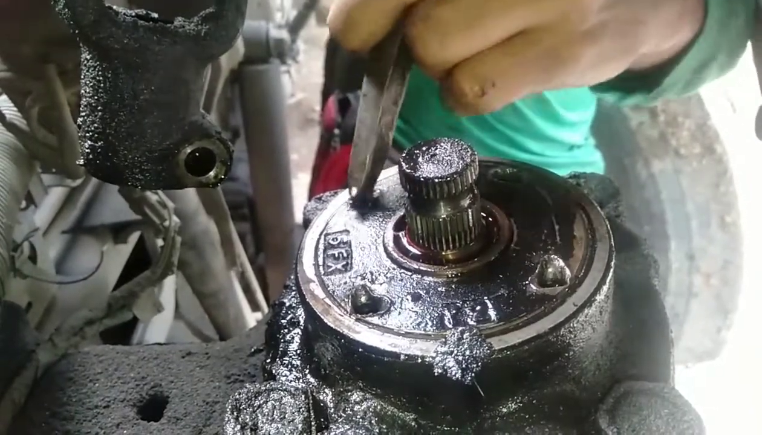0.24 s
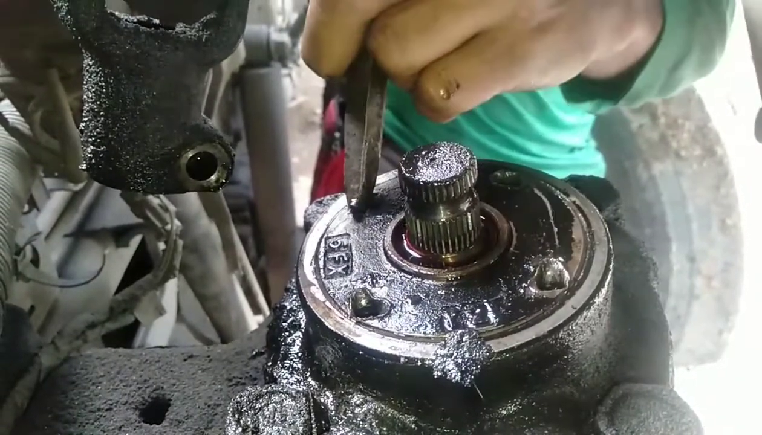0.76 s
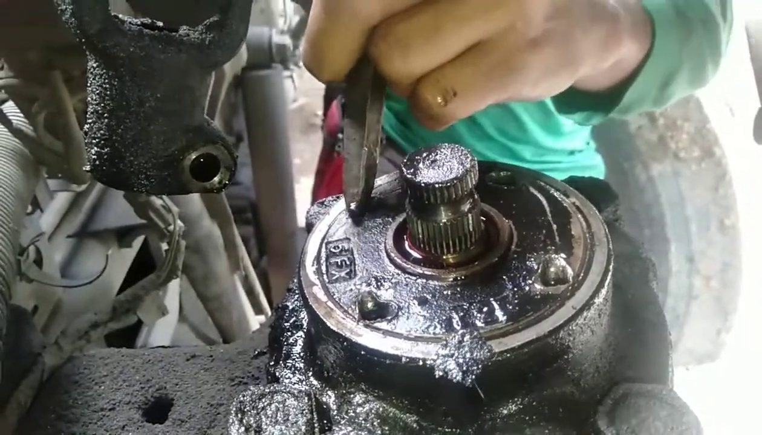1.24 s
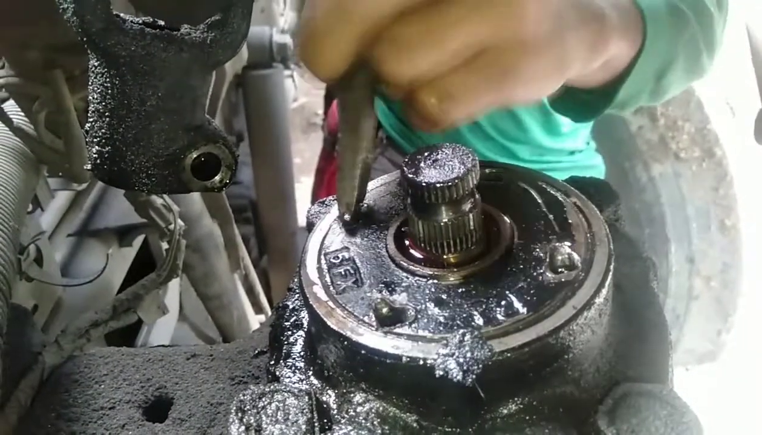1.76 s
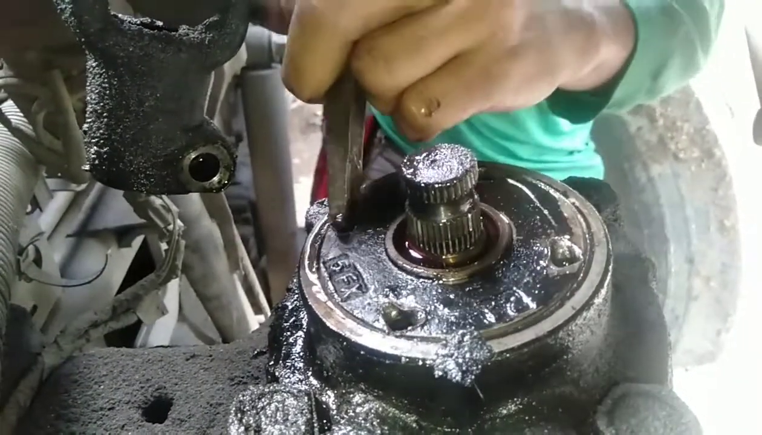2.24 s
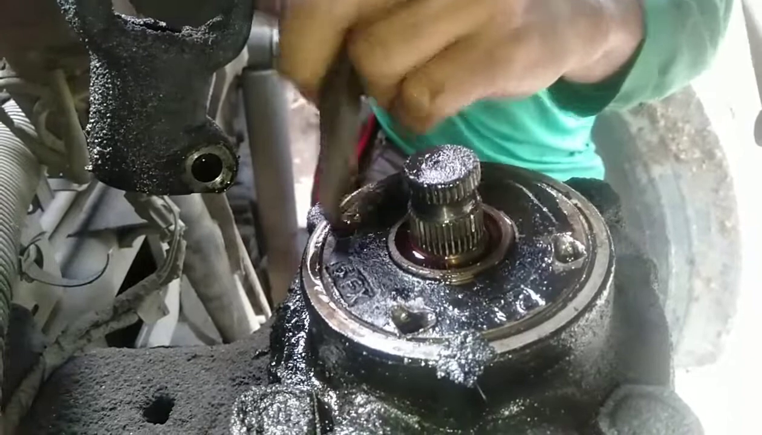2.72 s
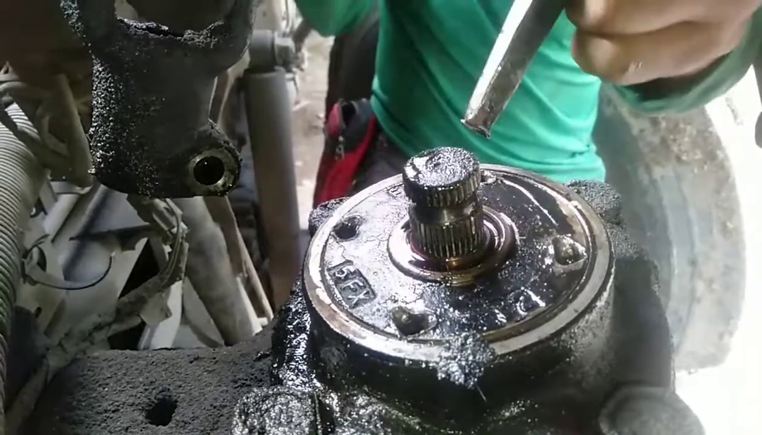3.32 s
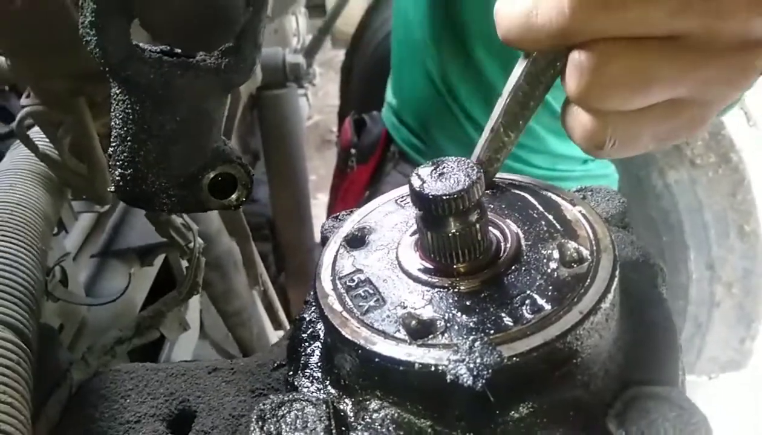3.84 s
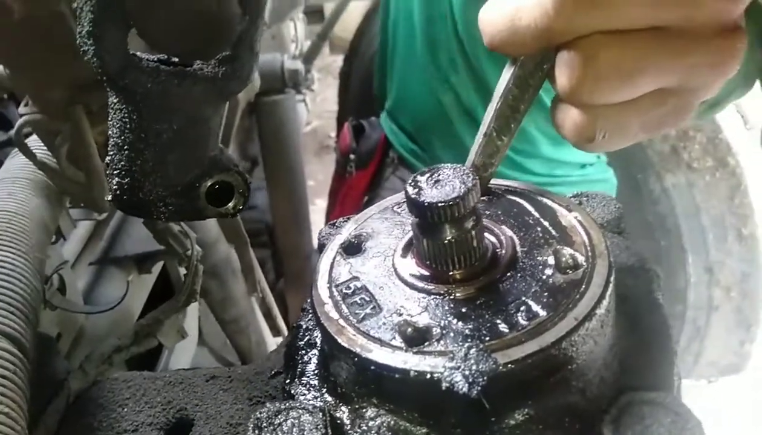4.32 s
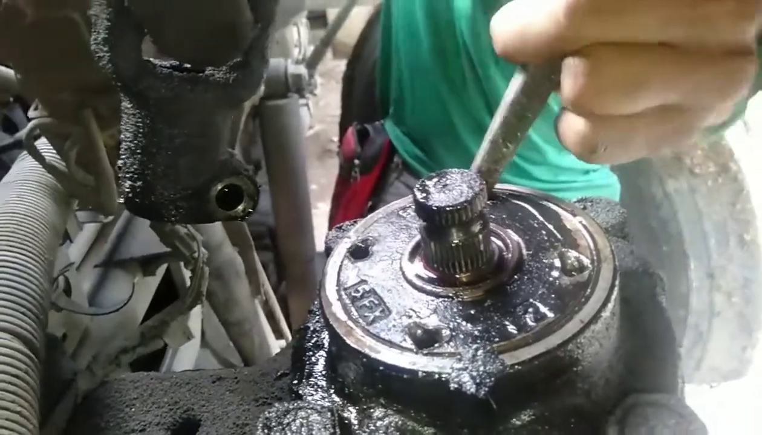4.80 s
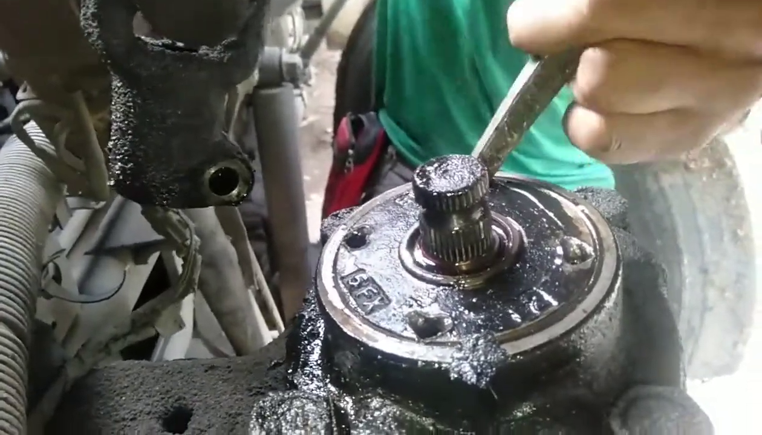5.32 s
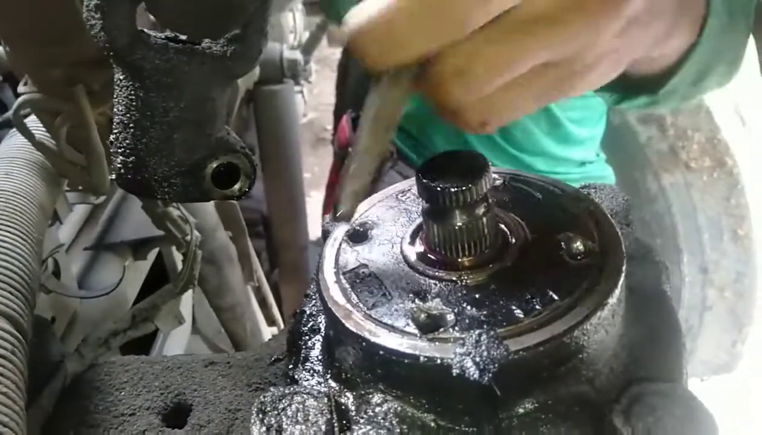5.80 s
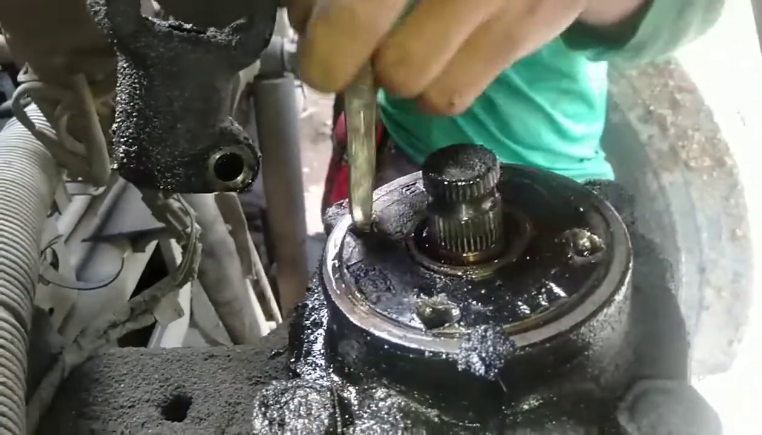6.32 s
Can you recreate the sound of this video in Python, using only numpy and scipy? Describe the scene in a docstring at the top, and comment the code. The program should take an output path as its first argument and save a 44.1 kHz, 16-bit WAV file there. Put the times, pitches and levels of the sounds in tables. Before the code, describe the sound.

Hammer blows on a steel chisel ring sharply in a workshop, five spaced clangs, a pause with clinks and scrapes, then three quicker blows and rattling.

```python
"""A hammer drives a steel chisel against the cover of a truck's steering gear, close by, in a workshop.
Each blow is a burst of shaped noise for the steel clash, over fading sine tones that beat as the chassis rings.
At one blow the cover gives way with a thud; around that blow the cover rattles, in ticks and short rings.
Between and after the runs of blows the chisel scrapes (uneven noise) and clinks (brief high rings).
Behind it all lie filtered noise for the air, a thin hiss and a low wavering hum."""
import sys
import numpy as np
from scipy import signal
from scipy.fft import rfft, irfft
from scipy.io import wavfile
from scipy.ndimage import uniform_filter1d

SR = 44100
rng = np.random.default_rng(int(sys.argv[2]) if len(sys.argv) > 2 else 0)


def bounce(signal):
    """Save signal as a 16-bit WAV file at the path given by the first command-line argument."""
    frames = np.transpose(np.atleast_2d(signal))
    limited = np.clip(frames, -1, 1)
    pcm = np.round(limited * 32767).astype(np.int16)
    wavfile.write(sys.argv[1], SR, pcm)


N = 288855
TIME = np.arange(N) / SR

# In all tables, t60 is the time a sound takes to fade by 60 dB.
# Colours give only the balance of pitches; the loudness is set separately.

# Hammer blows; the first lands just before the start:
# (time [s], force [dB], place of the tip [0 near rim - 1 far rim], how far the cover gives way [0-1],
#  chisel pitch [Hz], chisel ring [dB])
BLOWS = [(-.085, 0.5, 0, 0.23, 6500, -30), (0.8676, -.5, 0.035, 0, 6300, -22.5),
         (1.3232, 0, 0, .15, 6670, -19.5), (1.7316, 0.5, 0, 0.05, 6520, -23),
         (2.1612, .5, 0, 0.02, 6580, -21), (2.5680, -0.5, 0.11, 0.06, 6630, -21.5),
         (4.6407, 0, 0.94, 0.1, 6300, -27.5), (4.9019, -.5, 0.68, 0.95, 6580, -18.5),
         (5.051, -.5, 0.71, 0.21, 5350, -21)]

# What a blow wakes, one row per part:
# (level at the near rim [dB], extra at the far rim [dB], extra when the cover gives way fully [dB])
CLASH_RULE = (-21.5, 0.5, 1)
TREBLE_RULE = (-0.2, 6, -2.5)  # tilts the colour of the clash
ROOM_RULE = (-31.5, -4.5, 6.5)
CHASSIS_RULE = (-36, 0.5, -18.5)
COVER_RULE = (-70, 41, -5)
FRAME_RULE = (-53.5, 3, 26)

# Clash of steel on steel: colour (frequency [Hz], level [dB per Hz]),
# and fading before any stretch (frequency [Hz], t60 [s])
CLASH_COLOUR = [(25, 2), (80, -4), (170, -3), (330, -9), (650, -1.5), (1100, -1.5), (1900, -3.5),
                (2700, -8.5), (4000, -12), (5300, -11.5), (7300, -12.5), (9500, -19.5), (13000, -17),
                (15000, -9.5)]
CLASH_FADE = [(60, 0.097), (700, 0.25), (2000, 0.095), (5000, 0.1), (10000, 0.069), (15000, .065)]

# The workshop's echo: colour (frequency [Hz], level [dB per Hz]) and fading (frequency [Hz], t60 [s])
ROOM_COLOUR = [(40, 1), (150, -8.5), (330, -7.5), (550, -3), (830, 4.5), (1200, -2), (2000, -6.5),
               (3000, -15), (4800, -30), (6600, -23.5), (8000, -42.5), (15000, -32.5)]
ROOM_FADE = [(60, 1), (500, 1), (1000, 0.51), (2500, 0.38), (6500, 0.53), (15000, 0.24)]

# Ringing tones (modes) of each steel part: (frequency [Hz], relative level [dB], t60 [s])
CHASSIS_SHORT = [(533, -17, 1), (665, -12, .6), (667, -13, 0.77), (839, 1, 0.4), (856.4, 2.5, 0.6),
                 (926, -1.5, 0.29), (1057, -4, 0.54), (1400, -8.5, 0.37), (1560, -7.5, 0.5),
                 (2570, -2.5, 0.18)]  # the short clang
CHASSIS_MAIN = [(764.8, 0, 2.3), (788, 4, .7)]  # the main pair of tones
CHASSIS_SIDE = [(706.8, -16, 2.8), (730.2, -9, 3.1), (806, -18, 1.9), (893, -24, 1.8), (1056, -23, 1.9)]  # long tones beside the main pair
COVER_MODES = [(163, -9.5, 1), (1330, -14, .25), (2075, -11, .14), (2510, -5, 0.33), (2500, 0, 0.44),
               (12650, -16, .05)]  # gear cover, with nothing pressed on it
HAMMER_MODES = [(7130, 0, .75), (7165, -4, .5)]  # hammer head
FRAME_MODES = [(106, -4.5, 0.35), (151, -4.5, .5), (181, -1.5, 0.45), (209.6, -2.5, 0.37),
               (275, -5.5, 0.25), (366, -8, .42), (511, -5.5, 0.77), (1150, -8, 0.21), (1590, 1, 0.17),
               (2690, 3, 0.12), (4070, -3, 0.1), (5150, -5, 0.05)]  # heavy frame
CHISEL_MODES = [(2744, 0.5, 0.06), (2730, -25, 0.045), (6400, -6.5, 0.052), (6643, 0, 0.036),
                (6810, -3.5, 0.079), (13100, -45, 0.013), (12470, -13.5, 0.042)]  # loosely held chisel

# Steady workshop air: colour (frequency [Hz], level [dB per Hz])
AIR_COLOUR = [(20, 0), (50, -11), (110, -0.5), (220, -15), (500, -16.5), (1000, -26.5), (2000, -33),
              (4500, -41), (6600, -40), (9000, -43), (15000, -44)]
# Thin hiss that comes and goes: (time [s], level before an overall boost [dB])
HISS_LEVEL = [(0.0, -82), (0.47, -80), (1.42, -83.5), (2.72, -85), (2.94, -92.5), (4.38, -76.5),
              (4.93, -88), (5.07, -88), (5.49, -73.5), (5.67, -68), (6.05, -73), (6.55, -75)]
# Colour of the hiss: (frequency [Hz], level [dB per Hz])
HISS_COLOUR = [(400, 12), (1400, 9.5), (4500, -4), (6600, 3.5), (9000, -9.5), (13000, -2), (15000, 10)]
# Low hum, set in two pauses and joined between them: (time [s], level before an overall boost [dB])
HUM_LEVEL = [
    [(3.0, -67), (3.57, -58.5), (3.918, -76.5), (4.6, -56.5)],
    [(5.45, -65.5), (6.142, -66.5), (6.2, -54.5), (6.55, -57.5)],
]

# Light touches of the chisel tip: (time [s], ring level [dB], tick level [dB], bounces [count])
CLINKS = [(0.199, -65, -70, 2), (.309, -68, -59, 0), (3.473, -44, -51.5, 0), (3.51, -37, -44, 0),
          (5.349, -63.5, -74, 0), (5.834, -36, -50, 0), (5.84, -36, -50, 0), (5.94, -52.5, -59, 1),
          (6.041, -49.5, -55, 0), (6.2805, -24.5, -38.5, 0)]
# Tick of steel on the cover: colour (frequency [Hz], level [dB per Hz])
TICK_COLOUR = [(100, -13), (500, 2), (1000, 2), (1700, 3.5), (3000, -2), (4500, -3), (6800, -7),
               (9000, -20.5), (15000, -18)]
# Strokes of the tip over the cover: (start [s], length of the push [s], peak level [dB])
SCRAPES = [(4.08, 0.22, -54.5), (4.321, 0.018, -51), (4.448, 0.0055, -62.5), (6.518, 0.011, -56)]
# Colour of the scrapes: (frequency [Hz], level [dB per Hz])
SCRAPE_COLOUR = [(500, -20.5), (1000, -6), (1400, 3.5), (2700, -1.5), (4500, -10), (6800, -6),
                 (9000, -21.5), (15500, -15)]
# Rattles of the cover: (time [s], ring level [dB], tick level [dB])
RATTLES = [(4.689, -55.5, -39), (5.142, -44, -43), (5.235, -47, -55)]

CLASH_LENGTH, GIVE_STRETCH = 1.133, 0.7  # the clash lasts longer when the cover gives way
HELD_LENGTH = 0.55  # the pressed chisel shortens the cover's ring
HAMMER_DB = -41  # the hammer head's ring against the chisel's
OVERTONE_T60 = 0.25  # s
HUM_HZ = 66
CLINK_PITCH_SPREAD = 0.008  # small random spread of the pitch between touches, as a share
BOUNCE_S, BOUNCE_LOSS_DB = 0.027, 0.5
# Touches louder than EVEN_DB ring brighter: dB per octave for each dB above it
BRIGHT_PER_DB, EVEN_DB = 0.77, -38
PUSH_DB_PER_S, RELEASE_DB_PER_S, BITE_S = 72, 268, 0.002
EDGE_HZ = 15600  # top of the recorded band


def amp(db):
    """Turns decibels into a gain."""
    return 10 ** (np.asarray(db) / 20)


def unit(x):
    """Scales a sound to an average (rms) strength of 1."""
    return x / np.sqrt(np.mean(x ** 2) + 1e-20)


def read(points, hz):
    """Reads a table between its rows, on a logarithmic frequency axis."""
    f, value = np.transpose(points)
    return np.interp(np.log(hz + 1), np.log(f + 1), value)


def level(points):
    """Makes a gain curve from rows of (time [s], level [dB])."""
    return amp(np.interp(TIME, *np.transpose(points)))


def add(mix, s, sound):
    """Mixes a sound in at time s, which may lie before the start."""
    start = round(s * SR)
    sound = sound[max(-start, 0):]
    part = mix[max(start, 0):][:len(sound)]
    part += sound[:len(part)]


def tint(white, colour):
    """Gives white noise the spectrum colour(hz), in dB, and an rms of 1."""
    hz = np.fft.rfftfreq(len(white), 1 / SR)
    return unit(irfft(rfft(white) * amp(colour(hz)), len(white)))


def noise(colour, size):
    """Makes fresh coloured noise."""
    return tint(rng.standard_normal(size), colour)


def vary(pattern, likeness):
    """Mixes a shared random pattern with fresh noise, so blows are alike but not identical."""
    return likeness * pattern + np.sqrt(1 - likeness ** 2) * rng.standard_normal(len(pattern))


def swell(x, rise_s):
    """Fades in softly: vibration takes a moment to spread through a large body."""
    t = np.arange(len(x)) / SR
    return x * (1 - np.exp(-t / rise_s))


def die_away(x, t60):
    """Lets every frequency band fade at its own speed."""
    hz, t, bands = signal.stft(x, SR, nperseg=256)
    fading = amp(-60 * t / read(t60, hz)[:, None])
    return signal.istft(bands * fading, SR, nperseg=256)[1][:len(x)]


def ring(modes, size, length=1, pitch=1, scatter_db=1.0):
    """Tones that start together and beat as they fade; their strengths vary with the point of contact."""
    t = np.arange(size) / SR
    out = np.zeros(size)
    for hz, db, t60 in modes:
        start_db = db + scatter_db * rng.standard_normal()
        fading = amp(start_db - 60 * t / (t60 * length))
        out += fading * np.sin(2 * np.pi * hz * pitch * t)
    return out


def clash(pattern, length, treble_db, hinge_hz=3500, crack_db=4.5, crack_s=0.009,
          hold_db=3.0, hold_s=0.012, hold_width_s=0.0092):
    """Countless short modes of the heavy casting: a crack, then the loudness holds briefly before it drops."""
    t = np.arange(len(pattern)) / SR

    def colour(hz):
        return read(CLASH_COLOUR, hz) + treble_db * hz ** 2 / (hz ** 2 + hinge_hz ** 2)

    crack = crack_db * np.exp(-t / crack_s)
    hold = hold_db * np.exp(-((t / length - hold_s) / hold_width_s) ** 2)
    stretched_fade = [(hz, t60 * length) for hz, t60 in CLASH_FADE]
    return die_away(tint(pattern, colour), stretched_fade) * amp(crack + hold)


def thump(swing_s=0.021):
    """The overloaded microphone's low swing after a blow, heard as a faint thump."""
    u = np.arange(SR // 4) / SR / swing_s
    return u * (2 - u) * np.exp(-u)


def zing(pitch_hz, width_hz=430, upper=2.22, upper_db=-7, t60=0.086, swell_s=0.0012):
    """The chisel chatters in its seat, which smears two of its bending tones into bands of noise."""
    t = np.arange(SR // 2) / SR

    def band(hz, centre):
        return 1 / (1 + ((hz - centre) / width_hz) ** 4)

    def colour(hz):
        power = band(hz, pitch_hz) + amp(upper_db) ** 2 * band(hz, upper * pitch_hz)
        return 10 * np.log10(power)

    fading = np.exp(-np.log(1000) * t / t60)
    return swell(noise(colour, len(t)) * fading, swell_s)


def room(pattern, build_s=0.012, wall_s=0.144, wall_width_s=0.022, wall_db=-16.0):
    """The diffuse echo of a blow, with a soft return of the chisel's ring from a far wall."""
    t = np.arange(len(pattern)) / SR
    coloured = tint(pattern, lambda hz: read(ROOM_COLOUR, hz))
    tail = swell(die_away(coloured, ROOM_FADE), build_s)
    wall = np.zeros(len(t))
    add(wall, 0, zing(6500, width_hz=280, upper_db=-21.5, t60=0.44))
    around_return = np.exp(-((t - wall_s) / wall_width_s) ** 2)
    return tail + amp(wall_db) * wall * around_return


def overtones(lo_hz=1100, hi_hz=4200, db=-26.0, slope_db=-9.5, count=26):
    """Loosely coupled parts of the truck: each blow wakes a different handful of faint tones."""
    hz = lo_hz * (hi_hz / lo_hz) ** rng.random(count)
    modes = [(f, db + slope_db * np.log2(f / lo_hz), OVERTONE_T60) for f in hz]
    return ring(modes, size=SR, scatter_db=7.0)


def blows(steel_likeness=0.66, room_likeness=0.6, chassis_rise_s=0.012, mode_rise_s=0.00092,
          clang_scatter_db=5.5, clang_pitch_spread=0.012, thump_db=-5.5):
    """Each blow sets all the steel sounding and starts the long chassis tone afresh."""
    out = np.zeros(N)
    steel = rng.standard_normal(SR // 2)
    walls = rng.standard_normal(3 * SR // 2)
    ends = [row[0] for row in BLOWS[1:]] + [N / SR]
    for (s, force_db, place, give, pitch_hz, chisel_db), end in zip(BLOWS, ends):

        # where the chisel stands and how far the cover yields decide which parts answer
        def share_db(rule):
            return np.dot(rule, [1, place, give])

        def gain(rule):
            return amp(force_db + share_db(rule))

        length = CLASH_LENGTH + GIVE_STRETCH * give
        hit = clash(vary(steel, steel_likeness), length, share_db(TREBLE_RULE))
        add(out, s, gain(CLASH_RULE) * hit)
        add(out, s, -gain(CLASH_RULE) * amp(thump_db) * thump())
        add(out, s, amp(force_db + chisel_db) * zing(pitch_hz))
        add(out, s, gain(ROOM_RULE) * room(vary(walls, room_likeness)))

        # the clang's pitch varies a little at random; it dies first, so it sinks into the long tone
        pitch = 1 + clang_pitch_spread * rng.standard_normal()
        clang = ring(CHASSIS_SHORT, size=SR, pitch=pitch, scatter_db=clang_scatter_db) + overtones()
        until_next = round((end - s) * SR)
        tone = ring(CHASSIS_MAIN, size=until_next, scatter_db=3.0) + ring(CHASSIS_SIDE, size=until_next)
        for part in clang, tone:
            add(out, s, gain(CHASSIS_RULE) * swell(part, chassis_rise_s))

        cover = gain(COVER_RULE) * ring(COVER_MODES, size=SR, length=HELD_LENGTH)
        hammer = amp(force_db + chisel_db + HAMMER_DB) * ring(HAMMER_MODES, size=SR)
        frame = gain(FRAME_RULE) * ring(FRAME_MODES, size=SR)
        add(out, s, swell(cover + hammer + frame, mode_rise_s))
    return out


def background(air_db=-61, hiss_db=11.0, hum_db=1.0, waver_hz=0.4):
    """Workshop air and a thin hiss made of noise, and a hum whose pitch wavers slowly."""
    drift = unit(uniform_filter1d(rng.standard_normal(N), size=8000))
    phase = 2 * np.pi * np.cumsum(HUM_HZ + waver_hz * drift) / SR
    hum = amp(hum_db) * level(np.vstack(HUM_LEVEL)) * unit(np.sin(phase))
    hiss = amp(hiss_db) * level(HISS_LEVEL) * noise(lambda hz: read(HISS_COLOUR, hz), N)
    air = amp(air_db) * noise(lambda hz: read(AIR_COLOUR, hz), N)
    return air + hiss + hum


def touch(modes, ring_db, tick_db, pitch=1, tick_t60=0.1, rise_s=0.00041):
    """Steel meets steel lightly: a gritty tick and the ring of the struck part."""
    t = np.arange(SR // 2) / SR
    tick = noise(lambda hz: read(TICK_COLOUR, hz), len(t)) * np.exp(-np.log(1000) * t / tick_t60)
    ringing = ring(modes, size=len(t), pitch=pitch, scatter_db=0.0)
    return swell(amp(ring_db) * ringing + amp(tick_db) * tick, rise_s)


def clinks(hinge_hz=5500, echo_db=-19, echo_t60=0.26):
    """The tip touches the cover and may bounce; its pitch varies very slightly at random; a faint echo follows."""
    out = np.zeros(N)
    for s, ring_db, tick_db, bounces in CLINKS:
        # a harder touch sounds brighter because its tones below the hinge are weakened
        bright_db = BRIGHT_PER_DB * max(ring_db - EVEN_DB, 0)
        modes = [(hz, db + bright_db * np.log2(min(hz, hinge_hz) / hinge_hz), t60)
                 for hz, db, t60 in CHISEL_MODES]
        for k in range(round(bounces) + 1):
            pitch = 1 + CLINK_PITCH_SPREAD * rng.standard_normal()
            contact = touch(modes, ring_db, tick_db, pitch)
            add(out, s + k * BOUNCE_S, amp(-k * BOUNCE_LOSS_DB) * contact)
    t = np.arange(SR // 3) / SR
    echo = rng.standard_normal(len(t)) * np.exp(-np.log(1000) * t / echo_t60)
    return out + amp(echo_db) * signal.fftconvolve(out, echo / np.linalg.norm(echo))[:N]


def scrape(grit_db=3.5):
    """The tip bites, slides over dirty steel in small uneven slips as the push grows, and lets go."""
    push = np.zeros(N)
    t = np.arange(SR) / SR
    for s, length, peak_db in SCRAPES:
        growing = PUSH_DB_PER_S * (t - length)
        letting_go = RELEASE_DB_PER_S * (length - t)
        add(push, s, swell(amp(peak_db + np.minimum(growing, letting_go)), BITE_S))
    grit = unit(uniform_filter1d(rng.standard_normal(N), size=200))
    slips = unit(amp(grit_db * grit))
    return push * slips * noise(lambda hz: read(SCRAPE_COLOUR, hz), N)


def rattles():
    """The cover rattles: a tick and a short ring."""
    out = np.zeros(N)
    for s, ring_db, tick_db in RATTLES:
        add(out, s, touch(COVER_MODES, ring_db, tick_db))
    return out


def scene():
    """Everything heard at the microphone, as one channel."""
    return (blows() + background() + clinks() + scrape() + rattles())[None]


def record(dry):
    """The microphone rounds off the loudest peaks; then a filter removes the highest treble."""
    ceiling = 0.4
    pressed = ceiling * np.tanh(dry / ceiling)
    band_limit = signal.firwin(255, EDGE_HZ, window=("kaiser", 8), fs=SR)
    return signal.oaconvolve(pressed, band_limit[None], "same")


dry = scene()
out = record(dry)
bounce(out)
```